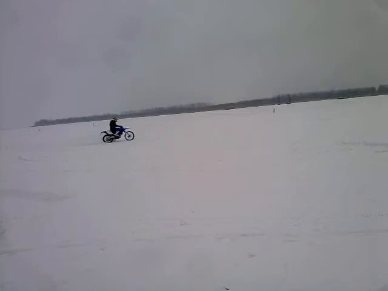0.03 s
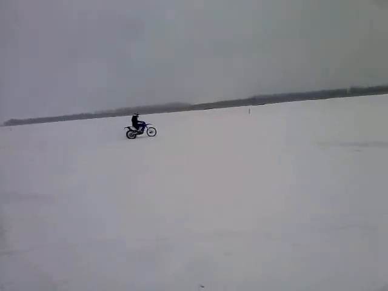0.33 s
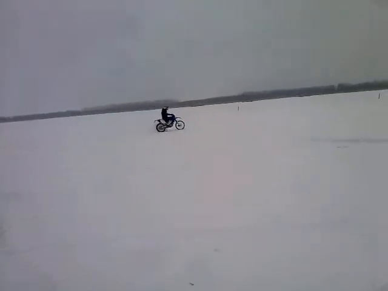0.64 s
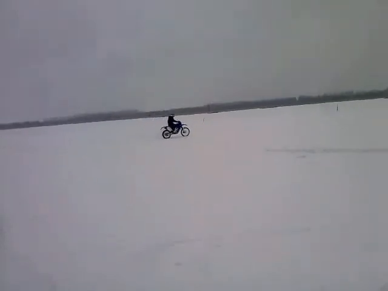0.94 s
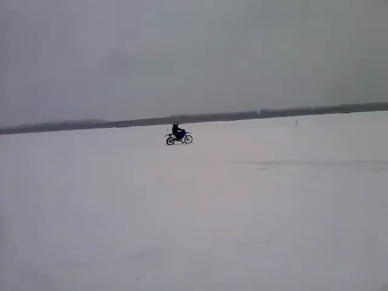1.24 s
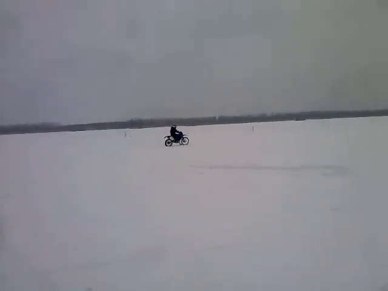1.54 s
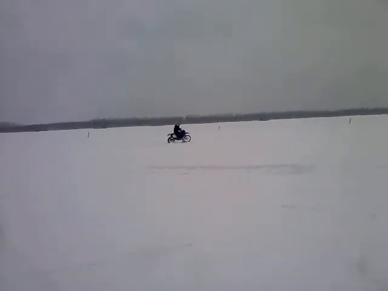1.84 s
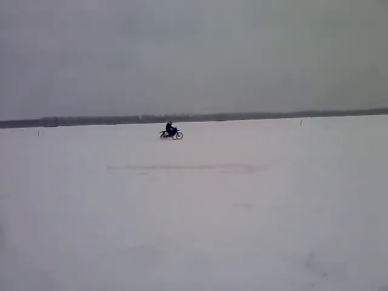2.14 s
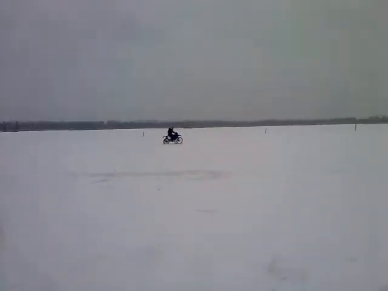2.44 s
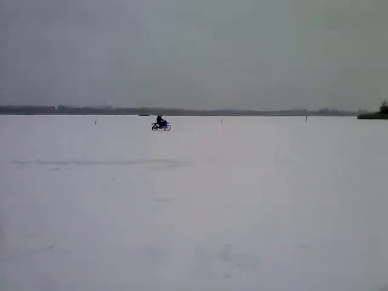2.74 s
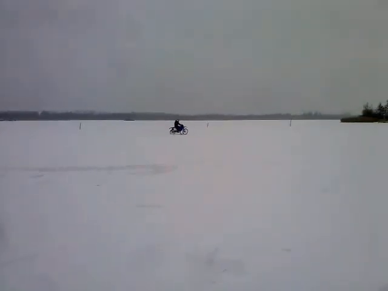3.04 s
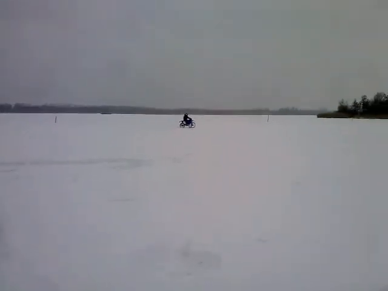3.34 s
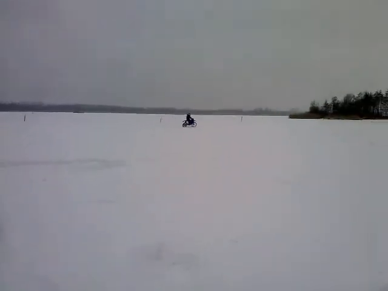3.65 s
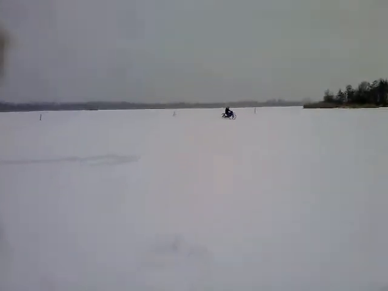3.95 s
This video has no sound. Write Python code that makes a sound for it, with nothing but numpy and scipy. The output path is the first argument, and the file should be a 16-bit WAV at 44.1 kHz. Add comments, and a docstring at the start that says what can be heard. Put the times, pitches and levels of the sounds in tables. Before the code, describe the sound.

A dirt bike rides away from the microphone across open snow, its exhaust booming and popping as the throttle opens and closes. The engine settles after a gear tick, then revs up again before one brief wind bump.

```python
"""A single-cylinder four-stroke dirt bike pulls away over a snowy frozen lake, the throttle opening
and closing. Each firing of the engine sends a boom, a ring of the pipe and a rasping, hissing blast
out of the exhaust, and now and then the silencer pops. Chain and tyres rush on the snow, the chain
sings thinly, and there is one tick like a gear change. Near the end, wind bumps the microphone once."""
import sys
import numpy as np
from scipy import signal
from scipy.fft import rfft, irfft
from scipy.io import wavfile
from scipy.ndimage import uniform_filter1d

SR = 44100
rng = np.random.default_rng(int(sys.argv[2]) if len(sys.argv) > 2 else 0)


def wrap_up_sound(samples):
    """Save the sound to the file named by the first command line argument, as 16-bit audio."""
    columns = np.atleast_2d(samples).T
    # keep every value between -1 and 1, then stretch to whole-number steps
    tamed = np.clip(columns, -1, 1)
    steps = np.round(tamed * 32767).astype(np.int16)
    wavfile.write(sys.argv[1], SR, steps)


N = 176400  # 4 seconds


def from_db(db):
    """Turn decibels into a number to multiply by."""
    return 10 ** (np.asarray(db) / 20)


def unit_level(x):
    """Scale a sound so that its average power is 1."""
    return x / np.sqrt(np.mean(x ** 2) + 1e-20)


def curve(rows):
    """Join (time, value) points with straight lines, giving a value at every sample."""
    return np.interp(np.arange(N) / SR, *np.transpose(rows))


def keep_side(x, hz, side, order=2):
    """Keep the "low" or the "high" side of a frequency."""
    return signal.sosfilt(signal.butter(order, hz, side, fs=SR, output="sos"), x + 1e-18)


def resonate(x, hz, width_hz):
    """Make a sound ring at one pitch; a narrower width rings longer."""
    decay = np.exp(-np.pi * width_hz / SR)
    feedback = [1, -2 * decay * np.cos(2 * np.pi * hz / SR), decay ** 2]
    return signal.lfilter(np.array([1, 0, -1]) * (1 - decay ** 2) / 2, feedback, x + 1e-18)


def colour(x, spectrum):
    """Turn each frequency up or down, following (frequency, level) points."""
    hz, db = np.transpose(spectrum)
    log_hz = np.log(np.arange(N // 2 + 1) * SR / N + 1)
    cepstrum = irfft(np.log(from_db(np.interp(log_hz, np.log(hz), db))))
    # folding makes the filter ring after a click, never before it
    cepstrum[1:N // 2] *= 2
    cepstrum[N // 2 + 1:] = 0
    return irfft(rfft(x) * np.exp(rfft(cepstrum)))


def clicks(times, sizes=1):
    """One click at each time."""
    out = np.zeros(N)
    out[np.clip((times * SR).astype(int), 0, N - 1)] = sizes
    return out


def puffs(train, rise_s):
    """Each click releases a puff of swirling gas that swells and dies away."""
    decay = np.exp(-1 / (rise_s * SR))
    swell = signal.lfilter([0, np.e / (rise_s * SR)], [1, -2 * decay, decay ** 2], train + 1e-18)
    return swell * rng.standard_normal(N)


def random_sizes(count, scatter_db):
    """Sizes that vary by chance around 1."""
    return from_db(scatter_db * rng.standard_normal(count))


def even_out(x, firings, scatter_db):
    """Make every engine cycle equally loud, give or take some chance."""
    cycle = np.cumsum(clicks(firings)).astype(int)
    power = np.bincount(cycle, x * x) / np.maximum(np.bincount(cycle), SR * np.diff(firings).min())
    gain = random_sizes(len(power), scatter_db) / np.sqrt(np.maximum(power, np.median(power) / 10))
    return x * uniform_filter1d(gain[cycle], size=60)


def play_rings(shape, times, sizes, pitch_ratios):
    """Play one ring at each time, with its own size and pitch."""
    steps, out = np.arange(len(shape)), np.zeros(N + SR)
    for start, size, ratio in zip((times * SR).astype(int), sizes, pitch_ratios):
        out[start + steps] += size * np.interp(steps * ratio, steps, shape, right=0)
    return out[:N] / np.abs(shape).max()


# How fast the engine runs: (time [s], speed [firings per second])
ENGINE_SPEED = [(0.275, 62.67), (0.34, 58.13), (0.41, 51.73), (0.48, 56.47), (0.59, 61.6), (0.66, 57.7),
                (0.73, 52.6), (0.8, 59.53), (0.94, 66.34), (0.98, 63.26), (1.1, 56.98), (1.18, 54.46),
                (1.28, 47.76), (1.39, 47.37), (1.63, 51.03), (1.68, 45.2), (1.77, 46.2), (1.82, 40.1),
                (2.0, 42.9), (2.2, 44.62), (2.62, 42.46), (2.8, 44.16), (3.0, 49.65), (3.32, 59.88),
                (3.5, 48.45), (3.72, 48.16), (3.88, 50.8), (4.0, 56.34)]

def engine(running):
    """The engine fires once a cycle. Gives the count of cycles so far and the firing times."""
    cycles = np.cumsum(curve(ENGINE_SPEED) * running) / SR - 0.31
    firings = np.flatnonzero(np.diff(np.floor(cycles)) > 0) / SR
    return cycles, firings


# How loud the throb is: (time [s], level [dB])
THROB_LEVEL = [(.28, -26.5), (.9, -32.5), (1.4, -33), (1.72, -41), (2.7, -42), (3.3, -33), (3.45, -34.5),
               (4, -39.5)]

def throb(cycles):
    """The exhaust throbs at the firing rate and, just as strongly, an octave above."""
    wave = np.cos(2 * np.pi * cycles) - np.cos(4 * np.pi * cycles)
    return np.sqrt(2) * wave * from_db(curve(THROB_LEVEL))


# The silencer's tone when it booms at 190 Hz: (frequency [Hz], level [dB])
SILENCER_TONE = [(30, -54), (62, -17.5), (90, -15.5), (112, -6.5), (140, -3), (168, 3.5), (190, 5.5),
                 (222, 0.5), (260, -10), (300, -16), (380, -33.5), (900, -79.5)]

def silencer(times, sizes, pitches_hz, length_s=0.075):
    """The silencer turns each pulse of gas into a boom of about three swings."""
    shape = -colour(clicks(np.zeros(1)), SILENCER_TONE)[:int(length_s * SR)]
    return play_rings(shape, times, sizes, pitches_hz / 190)


# The boom's pitch, higher when the gas is hot: (time [s], pitch [Hz])
BOOM_PITCH = [(.28, 199), (.6, 210), (1.2, 205), (1.63, 194.3), (1.69, 168), (1.82, 162), (1.95, 182.4),
              (2.7, 190.7), (3.2, 202.5), (4, 190)]
# How the boom swells and fades: (time [s], level [dB])
BOOM_LEVEL = [(0.28, -22.5), (0.39, -17), (0.62, -28.5), (0.63, -24), (0.81, -22.5), (0.93, -34.5),
              (0.97, -26), (1.43, -20), (1.63, -19), (1.68, -22), (1.71, -17), (1.77, -17), (1.8, -18.5),
              (1.84, -18), (2.55, -19), (3.4, -26), (3.42, -23), (3.88, -20), (3.98, -24)]

def boom(firings, delay_s=0.0001, gain_db=0.5):
    """One boom in the silencer for each firing makes the low exhaust note."""
    sizes = random_sizes(len(firings), scatter_db=1.3)
    note = silencer(firings + delay_s, sizes, np.interp(firings, *np.transpose(BOOM_PITCH)))
    power = uniform_filter1d(uniform_filter1d(note ** 2, size=3000), size=3000)
    steady_note = note / np.sqrt(np.maximum(power, power.mean() / 10))
    return steady_note * from_db(curve(BOOM_LEVEL) + gain_db)


# The pipe's notes when the engine runs at base_speed: (pitch [Hz], width [Hz], level [dB])
PIPE_NOTES = [(559, 162, 6.5), (769, 73, 3.5)]
# How the pipe's ring swells and fades: (time [s], level [dB])
PIPE_LEVEL = [(0.28, -23), (0.58, -21), (0.68, -31), (0.74, -20), (0.94, -28.5), (1.15, -20), (1.3, -32.5),
              (1.62, -19.5), (1.655, -30), (1.76, -49), (1.8, -28), (1.88, -24), (2.37, -29), (3.06, -23),
              (3.38, -29.5), (3.98, -22)]

def pipe(firings, base_speed=43.2, ring_s=0.014, gain_db=-4):
    """Each pressure pulse rings the exhaust pipe, higher as speed heats the gas."""
    pulse = clicks(np.zeros(1))
    shape = sum(from_db(db) * resonate(pulse, hz, width) for hz, width, db in PIPE_NOTES)
    shape = keep_side(shape, 451, "high", order=4)
    shape = keep_side(shape, 1470, "low")[:int(ring_s * SR)]
    pitch_ratios = (np.interp(firings, *np.transpose(ENGINE_SPEED)) / base_speed) ** 0.34
    rings = play_rings(shape, firings, np.ones(len(firings)), pitch_ratios)
    return even_out(rings, firings, scatter_db=1) * from_db(curve(PIPE_LEVEL) + gain_db)


# Where the rasp rings: (pitch [Hz], width [Hz], level [dB])
RASP_NOTES = [(1187, 240, -4.5), (1572, 260, 0.5), (2130, 202, -3)]
# The throttle, heard as the strength of the rasp: (time [s], level [dB])
THROTTLE = [(0.28, -15), (0.318, -24), (0.345, -21), (0.53, -12.5), (0.6, -16), (0.64, -28.5), (0.69, -31),
            (0.72, -17), (0.77, -14.5), (0.92, -17.5), (0.95, -32.5), (1.15, -17), (1.24, -26.5),
            (1.33, -25), (1.35, -49), (1.37, -25.5), (1.49, -22.5), (1.52, -16.5), (1.63, -18), (1.66, -29),
            (1.81, -32), (1.83, -18), (2.05, -21.5), (2.07, -18), (2.21, -23), (2.28, -20.5), (3.29, -16.5),
            (3.4, -29), (3.49, -28), (3.66, -18.5), (3.72, -22.5), (3.98, -17)]

def rasp(firings, fronts, gain_db=-2.5):
    """A sudden jump in pressure and a puff of swirling gas rasp at the outlet."""
    swirl = 0.45 * unit_level(puffs(clicks(firings), rise_s=0.001))
    sound = np.zeros(N)
    for k, (hz, width, db) in enumerate(RASP_NOTES):
        jumps = unit_level(clicks(fronts, random_sizes(len(fronts), scatter_db=4.6)))
        sound += (-1) ** k * from_db(db) * resonate(jumps + swirl, hz, width)
    sound = keep_side(sound, 2320, "low", order=6)
    sound = keep_side(sound, 940, "high")
    return even_out(sound, firings, scatter_db=0.5) * from_db(curve(THROTTLE) + gain_db)


# Where the blast's hard edge rings: (pitch [Hz], width [Hz], level [dB])
EDGE_NOTES = [(2060, 116, 3), (2550, 267, -5.5), (3380, 136, -11.5), (3960, 180, -14.5)]
# How that edge swells and fades: (time [s], level [dB])
EDGE_LEVEL = [(.28, -33), (1.3, -62), (1.9, -38.5), (2.8, -35), (2.93, -28), (3.3, -29), (3.42, -43.5),
              (3.64, -31), (3.76, -27.5), (3.83, -19.5), (4, -23.5)]

def hard_edge(firings, fronts):
    """Each jump in pressure also rings higher notes, giving the blast a hard edge."""
    jumps = clicks(fronts)
    crack = unit_level(jumps) + 1.15 * unit_level(puffs(jumps, rise_s=0.001))
    rings = sum((-1) ** k * from_db(db) * resonate(crack, hz, width)
                for k, (hz, width, db) in enumerate(EDGE_NOTES))
    rings = keep_side(rings, 4600, "low")
    return even_out(rings, firings, scatter_db=1.2) * from_db(curve(EDGE_LEVEL))


# The bright tone of the hiss, shared by the gear tick: (frequency [Hz], level [dB])
BRIGHT_TONE = [(1500, -43), (3000, -9), (3800, 0), (5400, 1), (6500, -7), (7600, -3.5), (8800, -22),
               (10800, -19.5), (12500, -33), (16000, -41)]
# How the hiss swells and fades: (time [s], level [dB])
HISS_LEVEL = [(0.28, -40), (0.57, -34), (0.7, -66), (0.76, -31.5), (0.89, -35.5), (0.97, -79),
              (1.12, -31.5), (1.29, -66), (1.54, -42.5), (1.58, -34), (1.72, -55), (1.91, -36.5),
              (2.37, -40), (2.86, -37.5), (2.93, -35), (3.29, -32), (3.38, -55), (3.47, -63), (3.62, -41),
              (3.98, -47)]

def hiss(firings, fronts, gain_db=-2):
    """Each puff of gas hisses as it leaves the outlet."""
    gas = colour(puffs(clicks(fronts), rise_s=0.0019), BRIGHT_TONE)
    return even_out(gas, firings, scatter_db=2.5) * from_db(curve(HISS_LEVEL) + gain_db)


# The tailpipe's echo, clearest while the outlet faces the microphone: (time [s], strength [0-1])
TAILPIPE_ECHO = [(1.2, 0.3), (1.9, 0.26), (3.4, .55), (3.85, 0.18)]

def tailpipe(x, delay_s=0.00165):
    """An upside-down echo from the pipe's open end makes the high sounds tinny."""
    strength = curve(TAILPIPE_ECHO)
    return (x - strength * np.roll(x, int(delay_s * SR))) / np.sqrt(1 + strength ** 2)


def blast(firings, delay_s=0.0005, jitter_s=0.00012):
    """Just after each firing, a pressure front bursts out with a rasp, a hard edge and a hiss."""
    fronts = firings + delay_s + jitter_s * rng.standard_normal(len(firings))
    return rasp(firings, fronts) + tailpipe(hard_edge(firings, fronts) + hiss(firings, fronts))


# The tone of chain and tyres on snow: (frequency [Hz], level [dB])
RUSH_TONE = [(30, -20), (150, -2.5), (380, -11.5), (700, -6.5), (1100, -5.5), (1600, -3.5), (2200, -6.5),
             (3000, -21), (4000, -14.5), (5500, -21.5), (7700, -29.5), (9000, -38), (15000, -54.5)]
# How loud their rush is: (time [s], level [dB])
RUSH_LEVEL = [(.28, -20), (.45, -24.5), (.7, -28), (1.4, -32.5), (2.6, -32.5), (3.15, -31), (3.45, -33),
              (4, -29)]

def snow_rush(flutter_db=2.5):
    """Chain, tyres and thrown snow make a fluttering rush that fades with distance."""
    flutter = unit_level(keep_side(rng.standard_normal(N), 60, "low"))
    rush = unit_level(colour(rng.standard_normal(N), RUSH_TONE))
    return rush * from_db(curve(RUSH_LEVEL) + flutter_db * flutter)


# The chain's thin singing: (time [s], pitch [Hz], level [dB])
CHAIN_SONG = [(0.277, 4700, -44), (.53, 4550, -42), (.67, 4500, -50), (0.819, 4400, -43),
              (1.15, 4330, -41.5), (1.602, 4080, -48), (4, 3940, -47.5)]

def chain(spread_hz=220):
    """The chain sings with a narrow metallic noise that sinks in pitch as the bike turns away."""
    times, hz, db = np.transpose(CHAIN_SONG)
    grit = keep_side(rng.standard_normal(N) + 1j * rng.standard_normal(N), spread_hz, "low")
    cycles = np.cumsum(curve(np.c_[times, hz])) / SR
    singing = (grit * np.exp(2j * np.pi * cycles)).real  # lifts the noise up to the pitch
    return unit_level(singing) * from_db(curve(np.c_[times, db]))


# Pops in the silencer: (time [s], level [dB])
POPS = [(0.3032, -13.5), (0.3532, -7.5), (0.4048, -10.5), (0.6277, -12.5), (0.963, -18), (1.2458, -13.5),
        (1.3497, -13.5), (1.657, -11.5), (3.3973, -16)]

def pops(pitch_hz=158.4):
    """Single extra pulses of gas pop in the silencer."""
    times, db = np.transpose(POPS)
    return silencer(times, from_db(db), np.full(len(times), pitch_hz))


# A tick while the throttle is shut: (time [s], level [dB])
GEAR_TICKS = [(1.698, -20)]

def gear_tick():
    """A short, bright metallic tick, like a gear change."""
    times, db = np.transpose(GEAR_TICKS)
    return colour(puffs(clicks(times, from_db(db)), rise_s=0.002), BRIGHT_TONE)


# A bump of wind: (time [s], level [dB])
GUSTS = [(3.872, -10)]

def wind(bottom_hz=100, top_hz=290):
    """A puff of air hits the microphone with a short, low bump."""
    times, db = np.transpose(GUSTS)
    air = puffs(clicks(times, from_db(db)), rise_s=0.0025)
    air = keep_side(air, top_hz, "low", order=3)
    air = keep_side(air, bottom_hz, "high", order=1)
    return air * np.sqrt(SR / (2 * top_hz))  # makes up for the level lost with the highs


def scene(start_s=0.275):
    """After a short silence, the engine drives the exhaust and the other sounds join it."""
    running = np.arange(N) / SR > start_s
    cycles, firings = engine(running)
    exhaust = throb(cycles) + boom(firings) + pipe(firings) + blast(firings)
    bike = exhaust + snow_rush() + chain() + pops() + gear_tick()
    return ((bike + wind()) * running)[None]


def record(dry, overload=0.65, cutoff_hz=16500):
    """The loudest peaks overload the microphone, and the very highest sounds are cut away."""
    squashed = dry / (1 + (dry / overload) ** 8) ** (1 / 8)
    return signal.sosfilt(signal.cheby2(14, 60, cutoff_hz, fs=SR, output="sos"), squashed)


dry = scene()
out = record(dry)
wrap_up_sound(out)
```